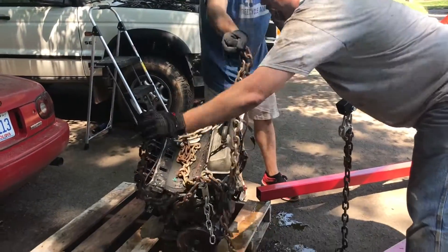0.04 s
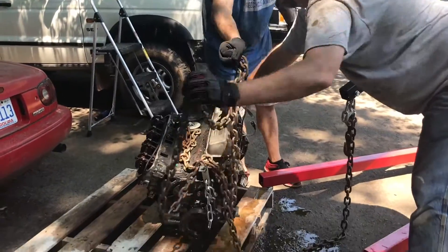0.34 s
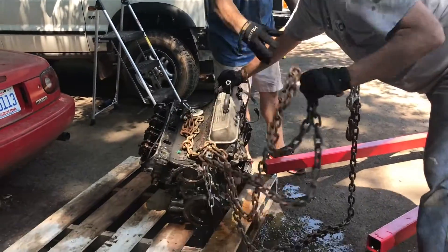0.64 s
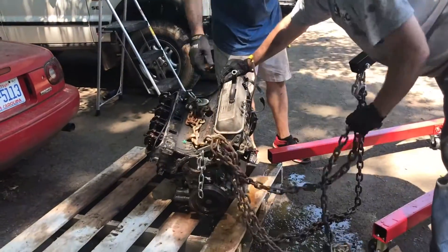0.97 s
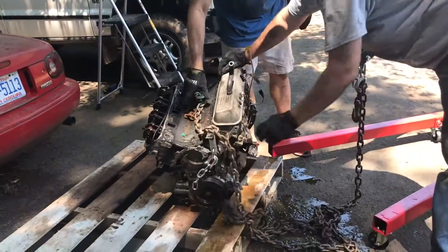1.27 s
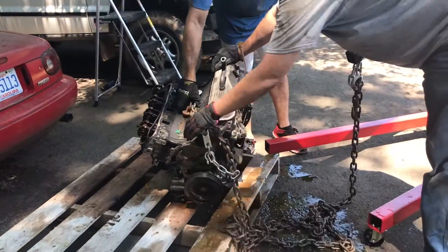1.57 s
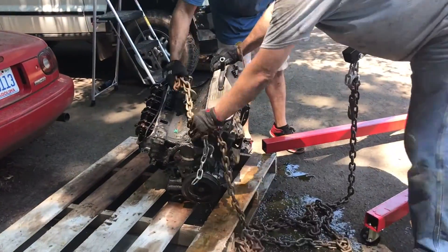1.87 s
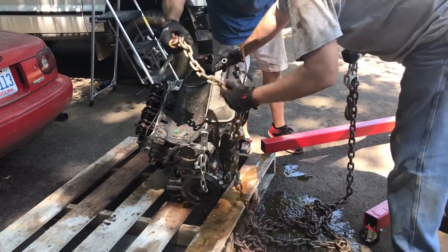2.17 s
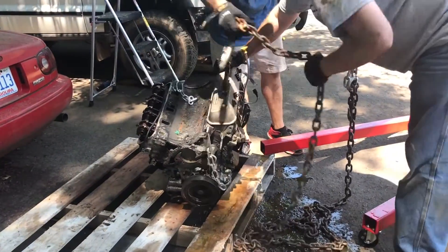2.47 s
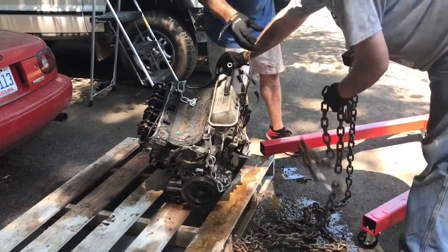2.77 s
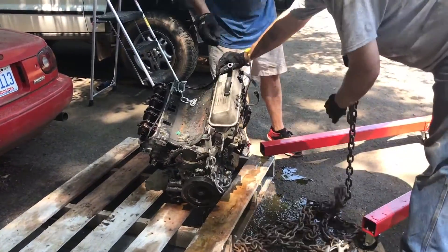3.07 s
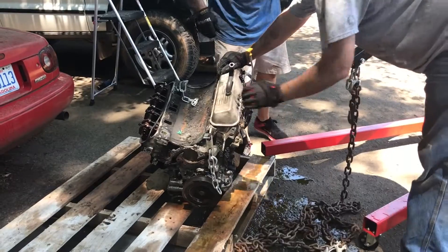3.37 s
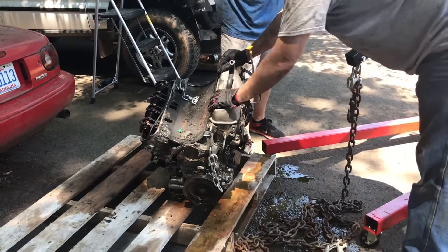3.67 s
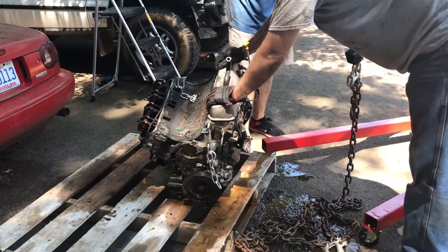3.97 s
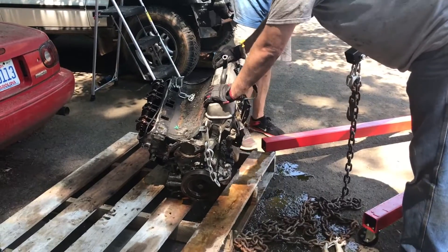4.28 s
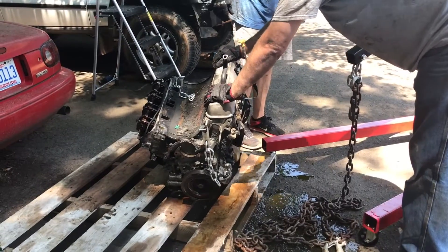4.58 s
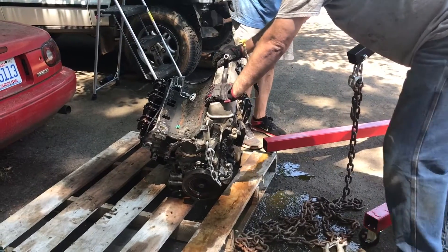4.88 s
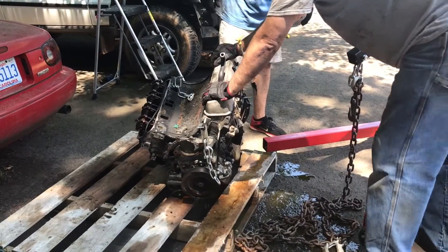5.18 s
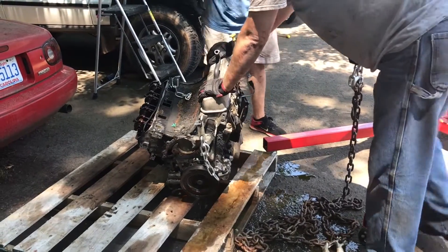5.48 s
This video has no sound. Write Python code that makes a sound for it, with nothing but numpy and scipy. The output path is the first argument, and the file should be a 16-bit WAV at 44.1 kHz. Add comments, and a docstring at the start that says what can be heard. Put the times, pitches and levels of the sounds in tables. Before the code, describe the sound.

Close, bright jangling of steel chains dragged over metal and dropped in heaps, with a thump and a faint distant engine hum.

```python
"""A driveway in the open air, one microphone close by, an engine humming far off.
Two heavy steel chains are pulled off an engine block and dropped. Their links clack together
and ring very high, in a rattle that thickens as they move harder. The slack piles up and lands
with a dull thump; links knock on a wooden pallet and on the block, and a loose steel part
rings once. The ground and parked cars return faint echoes."""
import sys
import numpy as np
from scipy import signal
from scipy.fft import rfft, irfft
from scipy.io import wavfile
from scipy.ndimage import uniform_filter1d

SR = 44100
rng = np.random.default_rng(int(sys.argv[2]) if len(sys.argv) > 2 else 0)


def wav_out(sig):
    """Save sig, one row per channel (or a flat mono array), as 16-bit PCM at SR to the path in sys.argv[1]."""
    wavfile.write(sys.argv[1], SR, np.round(np.clip(np.atleast_2d(sig).T, -1, 1) * 32767).astype(np.int16))


N = 248704
TIME = np.arange(N) / SR
AGE = TIME[:SR // 5]   # seconds since a contact


def from_db(db):
    """Decibels to gain."""
    return 10 ** (np.asarray(db) / 20)


def rms_one(x):
    """Each row scaled to rms 1."""
    return x / np.sqrt(np.mean(x ** 2, axis=-1, keepdims=True) + 1e-20)


def in_time(curve):
    """A curve's value at every sample."""
    return np.interp(TIME, *np.transpose(curve))


def noise(spectrum, shape):
    """Noise of a given colour, rms 1."""
    hz, db = np.transpose(spectrum)
    bins = np.fft.rfftfreq(shape[-1], 1 / SR) + 1e-3
    gain = from_db(np.interp(np.log(bins), np.log(hz), db)) * np.minimum(bins / hz[0], 1) ** 2
    return rms_one(irfft(rfft(rng.standard_normal(shape)) * gain, shape[-1]))


def add(out, at, wave):
    """Mixes a wave in from a given sample on."""
    out[at:at + len(wave)] += wave[:N - at]


def bursts(spectrum, t60, tail_db, tail_t60, count=48):
    """Unpitched contacts: noise with a quick decay and a slower tail, no two alike."""
    fade = from_db(-60 * AGE / t60) + from_db(tail_db - 60 * AGE / tail_t60)
    return rms_one(noise(spectrum, (count, len(AGE))) * fade)


def rings(modes, detune, uneven_db, rise_s, grip_s, free_db, count=48):
    """Struck bodies: uneven modes build up, are choked by the touching links, then ring on weakly."""
    out = 0
    for hz, db, t60 in modes:
        shift, strength, sign = rng.standard_normal((3, count, 1))
        fade = np.sign(sign) * from_db(db + uneven_db * strength) * from_db(-60 * AGE / t60)
        out = out + fade * np.sin(2 * np.pi * hz * (1 + detune * shift) * AGE)
    rise = 1 - np.exp(-AGE / rise_s)
    choke = np.exp(-AGE / grip_s) + from_db(free_db)
    return rms_one(out * rise * choke)


# Far engine, its harmonics: multiple, level/dB (levels in all tables are relative)
ENGINE_HARMONICS = [(1, -5), (2, -8.5), (4, -19)]
# Its slow swell and fade: t/s, level/dB
ENGINE_SWELL = [(0, -41.5), (.8, -50.5), (2.7, -46.5), (3.9, -47.5), (4.7, -45), (5.25, -43), (5.6, -51.5)]
# Open air all around the microphone: f/Hz, level/dB
AIR_SPECTRUM = [(15, -47.5), (25, -36.5), (40, -14.5), (62, -1), (86, -12.5), (118, -9), (196, -17),
                (231, -10), (257, -18.5), (354, -19), (769, -24), (952, -18), (1540, -27), (2430, -32.5),
                (15000, -54.5)]
# Air and engine sink under the loud rattling and recover: t/s, level/dB
BACKGROUND_DIPS = [(0, -5.5), (.8, -2.5), (.95, -33), (1.38, -27.5), (1.65, -7.5), (2.05, -5.5),
                   (2.3, -3.5), (2.75, -5), (3.1, -12.5), (3.4, -13), (3.75, -4), (5.6, -5.5)]
def air_and_engine(air_db, hum_hz, waver_hz):
    """Outdoor air and the wavering hum of a far engine."""
    waver = noise([(1, 2.0), (8, 0.5), (30, -27.0), (200, -92.0)], (N,))
    phase = 2 * np.pi * np.cumsum(hum_hz + waver_hz * waver) / SR
    swell_db = in_time(ENGINE_SWELL)
    hum = np.sqrt(2) * sum(from_db(db + swell_db) * np.sin(k * phase) for k, db in ENGINE_HARMONICS)
    air = from_db(air_db) * noise(AIR_SPECTRUM, (N,))
    return (hum + air) * from_db(in_time(BACKGROUND_DIPS))


# Close up, the clack of link on link and the dull clatter of what lies beneath: f/Hz, level/dB
CLACK_SPECTRUM = [(900, -18.5), (1600, -11.5), (2300, -5.5), (3300, 2.5), (4400, 4), (6300, 2.5),
                  (8300, 2.5), (10500, 2.5), (13000, 7.5), (15500, -5.5)]
CLATTER_SPECTRUM = [(130, -15), (300, -25.5), (600, -7), (1000, 1), (1550, 2), (2200, -6.5), (4000, -6.5),
                    (8000, -39)]
# Modes of the steel links: f/Hz, level/dB, t60/s
LONG_CHAIN_MODES = [(4158, -30.5, 0.0049), (4330, -26.5, 0.01195), (8100, -40.5, .06), (12810, 2.5, .14),
                    (13800, 0.5, 0.17), (14330, -4.5, 0.1113), (14700, -9.5, .11)]
SHORT_CHAIN_MODES = [(3200, -25.5, 0.1), (6100, -35.5, 0.12), (7230, -22, .2), (9300, -16, 0.16),
                     (9700, -28.5, 0.092), (9680, -16.5, .15), (11470, 7.5, 0.21), (11536, 9, 0.11),
                     (11900, 9, .14)]
PING_MODES = [(2900, -7.5, 0.024), (3397, -0.5, 0.072), (3715, -4, 0.012), (7750, -16.5, .08),
              (11700, -7, .04)]   # a hard-struck link bends
JANGLE_MODES = [(1938, -4, 0.017), (3252, -2.5, 0.079), (4495, -1, 0.017), (7010, 0, .07)]   # pinched links ring briefly, at a new pitch for every grip
def link_sounds():
    """The parts of a link contact, many of each: two noisy impacts and four kinds of ringing steel."""
    clack = bursts(CLACK_SPECTRUM, t60=.005, tail_db=-7.5, tail_t60=.091)
    clatter = bursts(CLATTER_SPECTRUM, t60=.014, tail_db=14.5, tail_t60=.036)
    long_ring = rings(LONG_CHAIN_MODES, detune=.007, uneven_db=4, rise_s=.0017, grip_s=.003, free_db=-8)
    short_ring = rings(SHORT_CHAIN_MODES, detune=.0013, uneven_db=4.5,
                       rise_s=.0013, grip_s=.0021, free_db=-8)
    ping = rings(PING_MODES, detune=.004, uneven_db=2, rise_s=.0005, grip_s=.005, free_db=-6)
    jangle = rings(JANGLE_MODES, detune=.16, uneven_db=4, rise_s=.0003, grip_s=.0027, free_db=-14.5)
    return clack, clatter, long_ring, short_ring, ping, jangle


BRISK_DB = -29.5   # vigour at which a rattle's part_db and per_s hold
CROWDING = .45   # dB of contact rate per dB of vigour
def rattle(movements, parts, part_db, follows, per_s, spread_db, even_s):
    """Moving chain: random contacts, many light and a few hard, faster and louder with more vigour."""
    chance = rng.random(N)
    strength = from_db(spread_db * rng.standard_normal(N))
    link = rng.integers(0, len(parts[0]), N)
    out = np.zeros(N)
    for movement in movements:
        s, vigour_db = np.transpose(movement)
        span = np.flatnonzero((TIME >= s[0]) & (TIME <= s[-1]))
        excess_db = np.interp(TIME[span], s, vigour_db) - BRISK_DB
        rate = per_s * from_db(CROWDING * excess_db)
        sizes = strength[span] * (chance[span] < rate / SR)
        power = np.abs(uniform_filter1d(sizes ** 2, int(even_s * SR))) + 1e-9
        sizes = sizes / np.sqrt(power * len(AGE))   # evened out, so vigour sets the loudness
        for k in np.flatnonzero(sizes):
            # each part follows the vigour by its own share
            gains = sizes[k] * from_db(np.array(part_db) + np.array(follows) * excess_db[k])
            add(out, span[k], sum(g * part[link[span[k]]] for g, part in zip(gains, parts)))
    return out


def clinks(events, parts, trim_db):
    """Hard contacts that stand out of the rattle."""
    out = np.zeros(N)
    for k, (s, *levels) in enumerate(events):
        gains = from_db(np.add(levels, trim_db))
        add(out, int(s * SR), sum(g * part[k % len(part)] for g, part in zip(gains, parts)))
    return out


# Long chain near the microphone, the vigour of its five movements: t/s, level/dB
STIR = [(0, -25), (.045, -34.5), (.09, -57), (.16, -44), (.2, -43), (.235, -69), (.28, -66)]
FIRST_THROW = [(0.715, -24.5), (0.767, -11), (0.817, -25), (0.827, -12), (0.873, -21), (0.983, -29.5),
               (1.149, -12.5), (1.191, -27), (1.301, -19.5), (1.473, -50.5), (1.48, -34)]
GATHERING = [(1.48, -38.5), (1.572, -40), (1.614, -60), (1.63, -33.5), (1.75, -26), (1.846, -26),
             (1.856, -19.5), (1.9, -40), (2.038, -39.5), (2.222, -52), (2.258, -37), (2.56, -56.5)]
SWING = [(2.585, -30.5), (2.679, -42), (2.687, -25.5), (2.767, -30), (2.8, -48.5)]
SECOND_THROW = [(2.82, -31), (2.838, -45), (2.862, -13.5), (2.932, -26.5), (2.984, -12.5), (3.104, -20),
                (3.328, -54), (3.356, -79.5), (3.42, -60.5)]
# Its hard contacts: t/s, clack level/dB, ring level/dB, clatter level/dB
LONG_CLINKS = [(.1012, -43, -36, -52), (.1143, -29, -53, -40.5), (.167, -25, -24.5, -50),
               (.228, -24.5, -29, -60), (.5964, -31.5, -37, -58), (.7108, -12, -15.5, -66),
               (.7237, -9, -16, -61.5), (.7398, -12.5, -13.5, -56), (.7674, -13, -17.5, -55),
               (.8187, -21, -26, -35), (.8245, -19, -22, -27.5), (.8488, -15, -25.5, -22.5),
               (.9333, -52, -48, -39.5), (1.0058, -28.5, -33, -42.5), (1.08, -18.5, -40, -42),
               (1.6265, -28, -39, -33.5), (1.6796, -26, -45, -41), (1.7422, -18.5, -22, -33),
               (1.7768, -27.5, -29.5, -39), (2.6267, -39, -32.5, -44), (2.668, -22.5, -26, -55.5),
               (2.6837, -38, -15.5, -69), (2.7632, -19, -30, -43), (2.815, -11, -16, -56),
               (2.831, -7.5, -23, -52.5), (2.8479, -5, -17.5, -21.5), (2.9424, -17, -12.5, -32),
               (3.0241, -12.5, -65, -55), (3.068, -12, -15.5, -27), (3.1704, -46, -24, -43),
               (3.1925, -52, -24, -42), (5.1816, -45.5, -75, -61.5)]
def long_chain(ring, clack, jangle, clatter):
    """The long chain is thrown twice; its links strike each other and what lies beneath."""
    movements = [STIR, FIRST_THROW, GATHERING, SWING, SECOND_THROW]
    rattling = rattle(movements, [ring, clack, jangle, clatter], part_db=[-31.5, -49, -54.5, -55.5],
                      follows=[1, .8, .96, .37], per_s=330, spread_db=5.5, even_s=.028)
    return rattling + clinks(LONG_CLINKS, [clack, ring, clatter], trim_db=[-30, -15, -15])


# Short chain, just as near, its vigour as it is drawn off the block: t/s, level/dB
SHORT_PULL = [(1.5, -39), (1.538, -32.5), (1.566, -42), (1.964, -28.5), (1.986, -20), (2.226, -29),
              (2.248, -15), (2.362, -27), (2.384, -19), (2.578, -47), (2.588, -33.5), (2.66, -59)]
# Its hard contacts: t/s, clack level/dB, ring level/dB, ping level/dB
SHORT_CLINKS = [(.0074, -19.5, -37, -47), (.0706, -32, -83, -41), (.1364, -31, -44, -47),
                (.3652, -15.5, -64, -33), (.412, -25.5, -39.5, -72), (.4236, -36, -49, -65),
                (.5665, -24.5, -31.5, -58), (1.5249, -47, -27.5, -67), (1.9704, -30, -29, -36.5),
                (1.9875, -29.5, -19, -46.5), (2.0228, -14.5, -30.5, -46.5), (2.0449, -26, -21, -52),
                (2.0754, -17.5, -22.5, -49), (2.1254, -24.5, -23.5, -49), (2.2347, -19, -16.5, -42.5),
                (2.2482, -20, -14.5, -53.5), (2.3813, -39.5, -26, -111), (2.5847, -26, -25.5, -50)]
def short_chain(ring, clack, jangle, ping):
    """The short chain clinks a few times, then jingles link on link as it slides off the block."""
    jingling = rattle([SHORT_PULL], [ring, clack, jangle], part_db=[-33, -55, -55],
                      follows=[1, .6, .7], per_s=160, spread_db=2.5, even_s=.038)
    return jingling + clinks(SHORT_CLINKS, [clack, ring, ping], trim_db=[-29, -14, -12])


# Loose links heaping on the ground or the block: t/s, length/s, clatter level/dB, clack level/dB
PILE_UPS = [(0.845, 0.037, -33, -31.5), (1.145, 0.18, -37.5, -49), (1.522, 0.036, -50, -45),
            (1.745, 0.11, -43.5, -41.5), (1.923, 0.079, -43.5, -40.5), (2.231, 0.026, -26, -42.5),
            (2.412, 0.065, -46.5, -54.5), (2.853, 0.023, -29.5, -20), (2.919, 0.18, -38.5, -37)]
def pile_ups(clatter, clack, settle_s, settle_db):
    """Slack piles up: a crash that starts at once, holds while links keep arriving, then settles."""
    def course(s, length, db):
        return [(s, db), (s + length, db), (s + length + settle_s, db - settle_db)]
    on_ground = [course(s, length, db) for s, length, db, _ in PILE_UPS]
    on_links = [course(s, length, db) for s, length, _, db in PILE_UPS]
    dull = rattle(on_ground, [clatter], part_db=[-32], follows=[1], per_s=700, spread_db=7.5, even_s=.02)
    bright = rattle(on_links, [clack], part_db=[-32], follows=[1], per_s=800, spread_db=6, even_s=.03)
    return dull + bright


# Slack landing nearby, once hard, twice lightly: t/s, level/dB, boom f/Hz, added slap f/Hz, length/s
THUMPS = [(0.8747, -11.5, 47.4, 1140, 0.021), (0.9015, -29.5, 130, 900, .005),
          (2.849, -24, 141, 1514, 0.004)]
def thumps(sweep_s):
    """The slack lands in a heap: a slap whose pitch falls at once to a short, heavy boom."""
    out = np.zeros(N)
    for s, db, boom_hz, slap_hz, length_s in THUMPS:
        hz = boom_hz + slap_hz / (1 + AGE / sweep_s) ** 2
        fade = from_db(db) / (1 + (AGE / length_s) ** 4)
        add(out, int(s * SR), fade * np.sin(2 * np.pi * np.cumsum(hz) / SR))
    return out


def knocks(events, modes, colour, ring_db, thud_db, thud_t60):
    """Links hit a larger body: a noisy thud and the body's modes."""
    ring = rings(modes, detune=.004, uneven_db=3, rise_s=.0006, grip_s=.006, free_db=-6, count=16)
    thud = bursts(colour, thud_t60, tail_db=-18, tail_t60=.11, count=16)
    waves = from_db(ring_db) * ring + from_db(thud_db) * thud
    out = np.zeros(N)
    for (s, db), wave in zip(events, waves):
        add(out, int(s * SR), from_db(db) * wave)
    low_cut = signal.butter(3, 140, "high", fs=SR, output="sos")   # the knocks carry no deep bass
    return signal.sosfilt(low_cut, out)


# Wooden pallet close by, links falling on it: t/s, level/dB
PALLET_KNOCKS = [(1.134, -19.5), (1.144, -19), (1.184, -20), (1.208, -16.5), (1.243, -17), (1.26, -18.5),
                 (1.285, -15), (1.298, -11), (1.339, -24.5), (1.389, -33.5), (1.444, -31.5), (1.545, -27.5)]
# Its modes: f/Hz, level/dB, t60/s
PALLET_MODES = [(540, -11, 0.054), (629, -8.5, 0.3), (842, -3, 0.058), (955, 7, 0.1), (1162, 9.5, 0.061),
                (1320, -3, 0.067), (1730, -1, 0.037)]
# Its thud: f/Hz, level/dB
WOOD_SPECTRUM = [(100, -52), (220, -4.5), (400, -11.5), (650, 3.5), (1150, 4.5), (1700, -5), (2600, -14.5),
                 (6000, -28)]
def pallet():
    """Falling links drum on the wood, which answers with a thud and a low ring."""
    return knocks(PALLET_KNOCKS, PALLET_MODES, WOOD_SPECTRUM, ring_db=-21.5, thud_db=-25.5, thud_t60=.17)


# Engine block close by, links striking it: t/s, level/dB
BLOCK_KNOCKS = [(1.627, -28), (1.83, -35), (2.235, -15), (2.252, -14), (2.297, -21.5), (2.437, -28)]
# Its modes: f/Hz, level/dB, t60/s
BLOCK_MODES = [(238, -9.5, .06), (393, -10.5, 0.069), (530.6, -1, .13), (635, 2, .06), (810, -2.5, .14),
               (946, -9, 0.095), (1150, -8, .14), (1353, -8.5, 0.091), (1440, -11.5, .12), (1665, 0, 0.084),
               (2530, -14, 0.102), (3180, -13.5, .1), (4340, -8.5, 0.079)]
def engine_block():
    """Passing links strike the block, whose many modes die quickly."""
    return knocks(BLOCK_KNOCKS, BLOCK_MODES, CLATTER_SPECTRUM, ring_db=-24.5, thud_db=-33.5, thud_t60=.03)


# Loose steel part beside the chain, its one knock: t/s, level/dB
STEEL_KNOCK = [(2.023, -33)]
# Its modes: f/Hz, level/dB, t60/s
STEEL_MODES = [(791, -4.5, 0.38), (1712, -11.5, .4), (2880, -17.5, .3), (3241, -12, .25)]
def loose_steel():
    """A loose steel part rings once as the chain slips past."""
    return knocks(STEEL_KNOCK, STEEL_MODES, CLATTER_SPECTRUM, ring_db=-19, thud_db=-35.5, thud_t60=.02)


def driveway(direct, wet_db, t60):
    """Adds faint scattered echoes from the ground and parked cars."""
    age = TIME[:SR // 2]
    echoes = rng.standard_normal(len(age)) * from_db(-60 * age / t60) * (age > .004)
    return direct + from_db(wet_db) * signal.fftconvolve(direct, echoes / np.linalg.norm(echoes))[:N]


def scene():
    """At the microphone, in mono: chains, knocks and thumps close up, air and engine behind."""
    clack, clatter, long_ring, short_ring, ping, jangle = link_sounds()
    chains = long_chain(long_ring, clack, jangle, clatter)
    chains += short_chain(short_ring, clack, jangle, ping)
    chains += pile_ups(clatter, clack, settle_s=.03, settle_db=25)
    struck = pallet() + engine_block() + loose_steel()
    near = driveway(chains + struck, wet_db=-16, t60=.41) + thumps(sweep_s=.0013)
    far = air_and_engine(air_db=-49, hum_hz=57.1, waver_hz=2.3)
    return (near + far)[None]


def record(dry):
    """The treble is cut steeply above 15750 Hz."""
    return signal.sosfilt(signal.ellip(12, .1, 80, 15750, fs=SR, output="sos"), dry)


dry = scene()
out = record(dry)
wav_out(out)
```